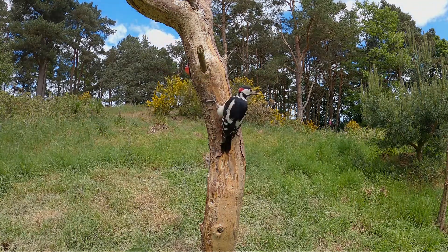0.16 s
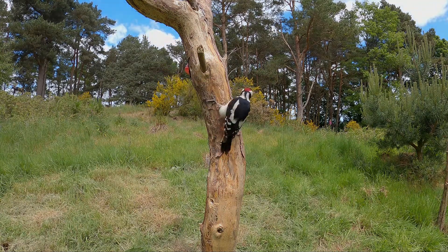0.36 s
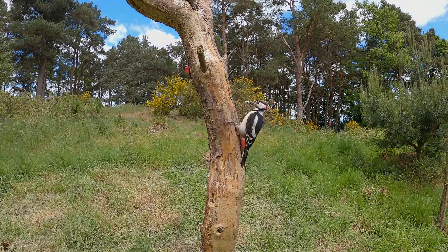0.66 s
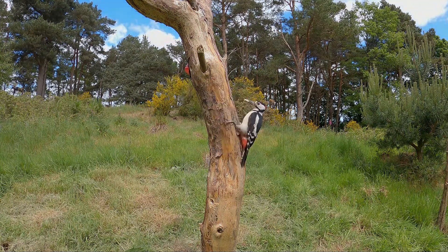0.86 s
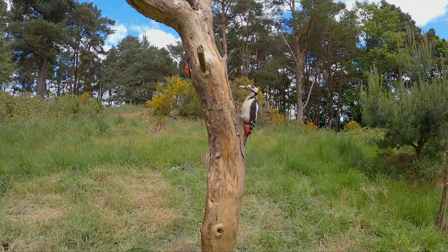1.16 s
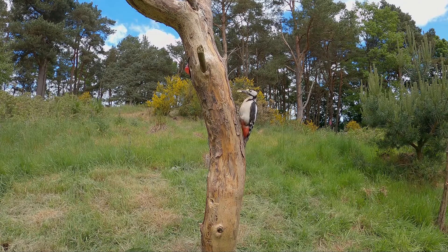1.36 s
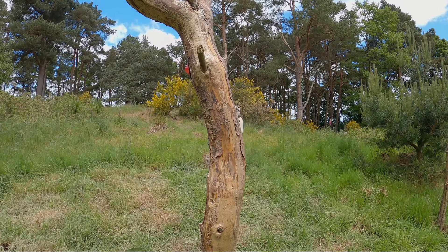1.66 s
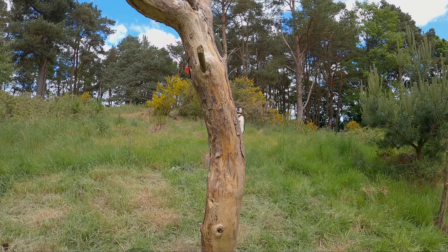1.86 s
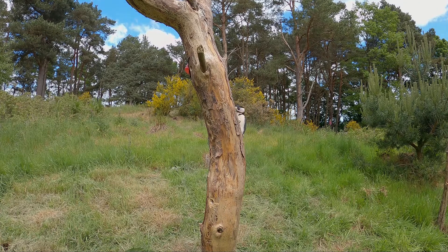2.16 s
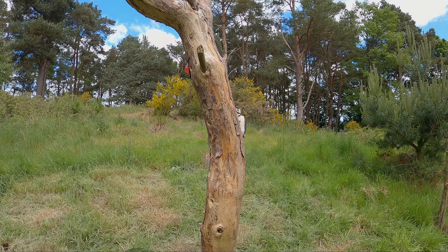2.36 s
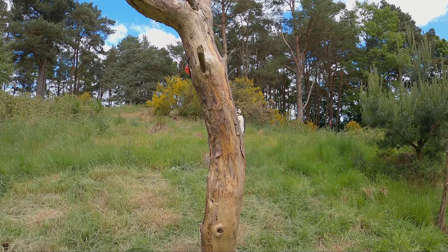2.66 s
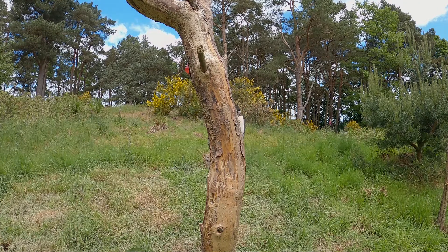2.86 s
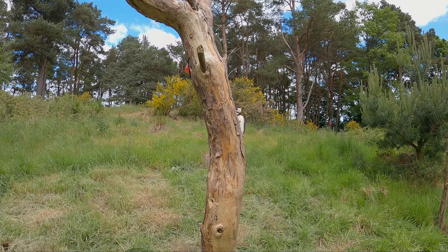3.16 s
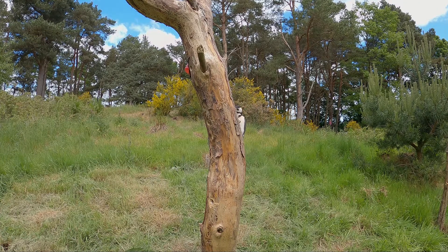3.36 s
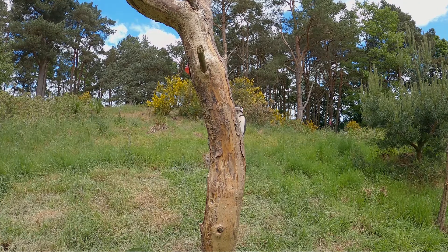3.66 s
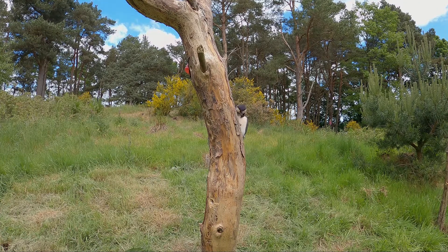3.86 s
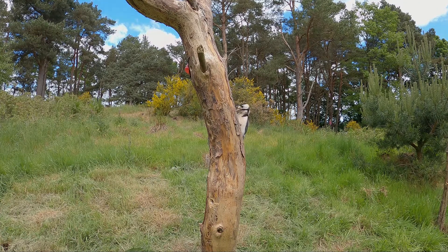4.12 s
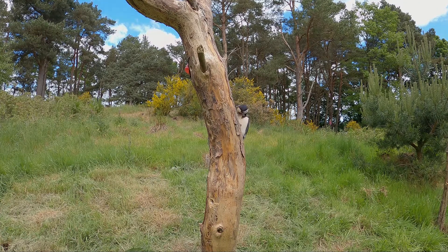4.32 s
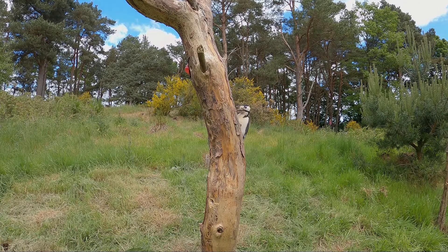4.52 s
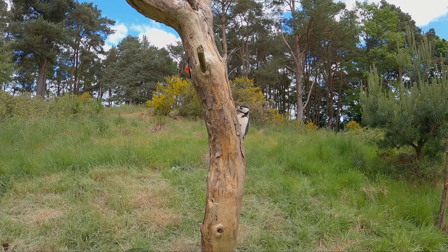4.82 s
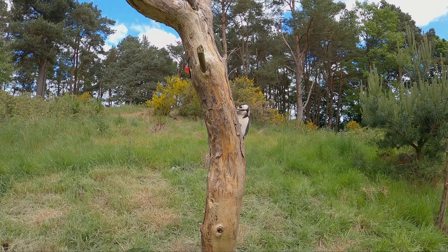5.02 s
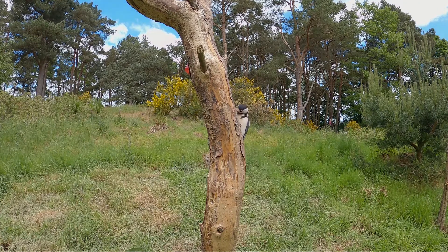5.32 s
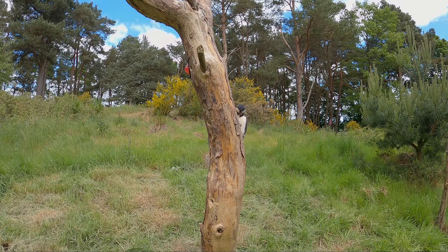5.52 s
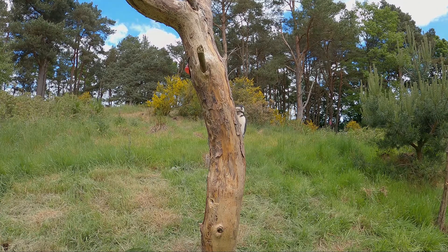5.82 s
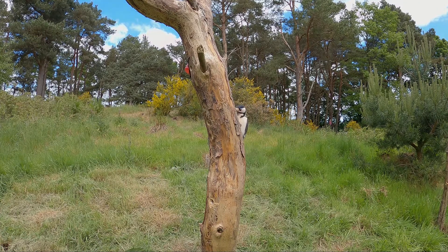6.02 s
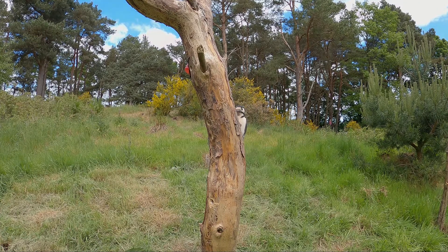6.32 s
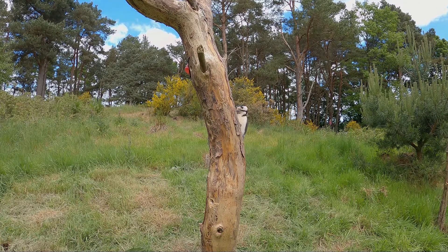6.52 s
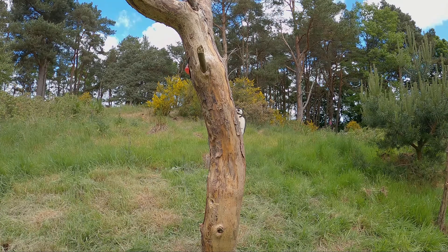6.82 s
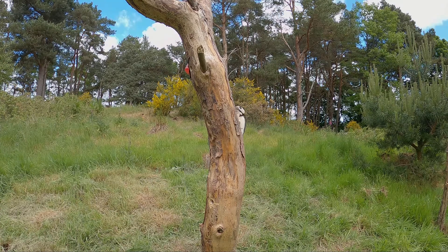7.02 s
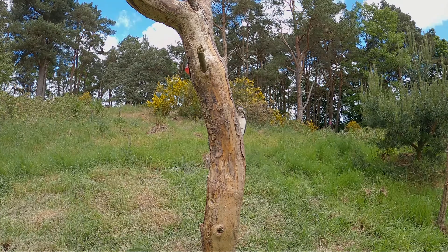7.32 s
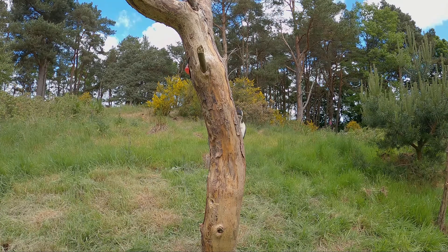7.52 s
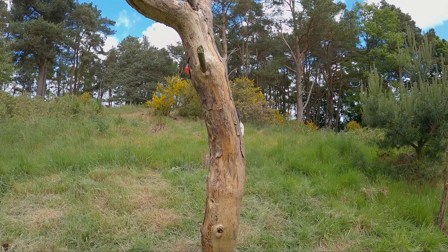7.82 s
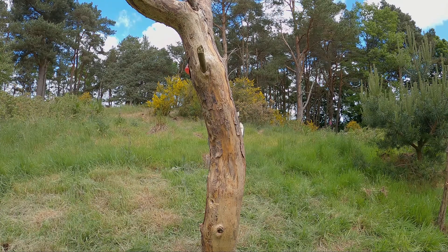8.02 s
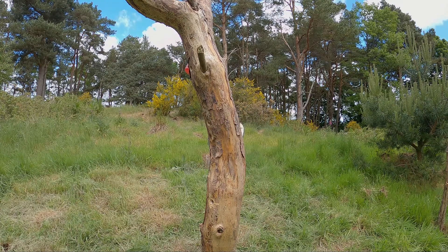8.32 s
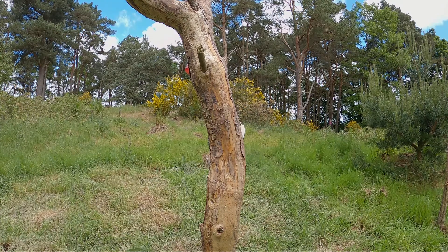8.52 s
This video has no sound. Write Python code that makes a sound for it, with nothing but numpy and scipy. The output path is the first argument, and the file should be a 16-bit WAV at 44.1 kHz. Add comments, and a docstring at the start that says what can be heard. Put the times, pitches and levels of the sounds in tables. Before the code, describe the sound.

Quiet open woodland in stereo, with soft air, faint leaves and far birds. Claws scrape a dry trunk in short crisp scratches, then a bill knocks it at uneven intervals, each a dry crack with a hollow thump. Whistles and chirps echo lightly among the trees. Midway, low lumpy wind buffets the left of the microphone, then fades, leaving birds, one clear late tap and small claw scratches.

```python
"""In a wood, a woodpecker hitches round a dead trunk, claws scratching, and taps it with its bill.
Songbirds call behind: gliding near-sine notes, some blurred by scattered paths, plus a faint far chorus.
Distant air and leaves are coloured noise; a gust is lumpy low noise, strongest on the left port.
Claws are ringing grains, noise snaps and plucked splinters; the bill is a noise crack that rings the wood.
Decaying noise echoes the birds and trunk, and the microphone adds a faint hiss."""
import sys
import numpy as np
from scipy import signal
from scipy.fft import rfft, irfft, next_fast_len
from scipy.io import wavfile

SR = 44100
rng = np.random.default_rng(int(sys.argv[2]) if len(sys.argv) > 2 else 0)


def transcribe(signal):
    """Save signal, clipped to [-1, 1], as a 16-bit WAV file at the path in sys.argv[1]."""
    frames = np.atleast_2d(signal).T
    limited = np.clip(frames, -1, 1)
    pcm = np.round(limited * 32767).astype(np.int16)
    wavfile.write(sys.argv[1], SR, pcm)


N = 382788
T = np.arange(N) / SR
SIZE = next_fast_len(N + SR)  # FFT length, with a second to spare


def amp(db):
    """Turn decibels into a plain multiplier."""
    return 10 ** (np.asarray(db) / 20)


def rms_one(x):
    """Scale to an RMS (average strength) of one."""
    return x / np.sqrt(np.mean(x ** 2) + 1e-20)


def at_hz(points):
    """Read a (frequency [Hz], value) table at every FFT bin, on a log-frequency axis."""
    hz, value = np.transpose(points)
    bin_hz = np.arange(SIZE // 2 + 1) * SR / SIZE
    return np.interp(np.log(bin_hz + 1), np.log(hz + 1), value)


def colour(x, spectrum):
    """Filter to a spectrum, minimum phase so nothing sounds early; white noise keeps its power."""
    gain = rms_one(amp(at_hz(spectrum)))
    cepstrum = irfft(np.log(gain), SIZE)
    # folding the cepstrum forward in time gives the minimum-phase filter
    cepstrum[1:SIZE // 2] *= 2
    cepstrum[SIZE // 2 + 1:] = 0
    response = np.exp(rfft(cepstrum))
    return irfft(rfft(x, SIZE) * response, SIZE)[..., :N]


def lowpass(x, order, hz):
    """Keep what lies below a frequency."""
    return signal.sosfilt(signal.butter(order, hz, fs=SR, output="sos"), x)


def highpass(x, order, hz):
    """Keep what lies above a frequency."""
    return signal.sosfilt(signal.butter(order, hz, "high", fs=SR, output="sos"), x)


def drift(rate_hz):
    """Slow random wandering: noise twice through a one-pole low-pass, with a spread of one."""
    r = np.exp(-2 * np.pi * rate_hz / SR)
    noise = rng.standard_normal(N + SR)
    settled = signal.lfilter([1], [1, -2 * r, r * r], noise)[SR:]
    return rms_one(settled)


def near_noise(unlike=0.28):
    """White noise from close by, mostly the same on both sides."""
    mid, side = rng.standard_normal((2, N))
    return (mid + unlike * side * [[1], [-1]]) / np.hypot(1, unlike)


def bursts(times, levels_db, t60, rise_s):
    """Noise that jumps up at each time and falls 60 dB in t60 seconds."""
    envelope = np.zeros(N)
    t = np.arange(int(t60 * SR)) / SR
    for s, db in zip(times, levels_db):
        part = envelope[int(s * SR):int(s * SR) + len(t)]
        shape = amp(db - 60 * t / t60) * (1 - np.exp(-t / rise_s))
        part += shape[:len(part)]
    return envelope * near_noise()


def strike(times, levels_db, modes, spread_db, contact_hz, lean_db=0):
    """Each blow rings every mode with a strength of its own; a long contact softens the click."""
    out = np.zeros(N)
    luck = rng.standard_normal((len(times), len(modes)))
    for k, (hz, db, t60) in enumerate(modes):
        # a lean raises modes above 3850 Hz and lowers those below by the same amount
        lean = lean_db * np.sign(hz - 3850)
        clicks = np.full(N, 1e-18)
        clicks[(times * SR).astype(int)] = amp(levels_db + db + spread_db * luck[:, k] + lean)
        r, w = amp(-60 / (t60 * SR)), 2 * np.pi * hz / SR
        out += signal.lfilter([0, np.sin(w)], [1, -2 * r * np.cos(w), r * r], clicks)
    return lowpass(out, 4, contact_hz)


def pings(times, levels_db, pitches_hz, cycles):
    """One sine for each event, at a pitch of its own, falling 60 dB over the given cycles."""
    out = np.zeros(N)
    for s, db, hz in zip(times, levels_db, pitches_hz):
        t = np.arange(int(cycles / hz * SR)) / SR
        ping = amp(db - 60 * t * hz / cycles) * np.sin(2 * np.pi * hz * t)
        out[int(s * SR):int(s * SR) + len(t)] += ping
    return out


# background before its waver and left-right mix:
# (time [s], distant air level [dB], leaves level [dB])
AIR_LEVELS = [(0, -65.5, -70), (1, -64, -68.5), (2.7, -62, -67), (4, -61.5, -67.5), (5.401, -64.5, -68.5),
              (6.76, -64, -69), (6.8, -63, -76), (8.68, -64.5, -76)]
# tone of the distant air: (frequency [Hz], relative level [dB per Hz])
DISTANT_TONE = [(20, -24.5), (35, -7), (60, -14.5), (112, -19.5), (140, -5.5), (168, -1.5), (300, -5),
                (500, -1), (620, -12), (820, -17), (1050, -7.5), (1480, -10), (1620, -19), (2500, -61.5)]
# tone of the leaves: (frequency [Hz], relative level [dB per Hz])
LEAVES_TONE = [(940, -28.5), (1600, -5.5), (2740, -3), (3830, -2), (4460, -6.5), (5610, -8), (6610, -14.5),
               (15800, -44)]
# how alike the background is left and right: (frequency [Hz], likeness [1 = the same])
AIR_LIKENESS = [(60, 1), (200, 0.47), (480, 0.94), (1100, 0.58), (3400, 0.27), (4300, 0.1), (12000, 0.11)]


def air():
    """Far rush and nearer leaves: two coloured noises that waver, partly alike in both ears."""
    s, distant_db, leaves_db = np.transpose(AIR_LEVELS)
    white = rng.standard_normal((2, 2, N))
    distant_gain = amp(np.interp(T, s, distant_db) + 0.7 * drift(1.0))  # waver spread 0.7 dB
    leaves_gain = amp(np.interp(T, s, leaves_db) + 0.5 * drift(13.0))  # waver spread 0.5 dB
    both = distant_gain * colour(white[0], DISTANT_TONE)
    both += leaves_gain * colour(white[1], LEAVES_TONE)
    mid, side = rfft(both, SIZE)
    alike = np.clip(at_hz(AIR_LIKENESS), -1, 1)
    stereo = np.sqrt(1 + alike) * mid + np.sqrt(1 - alike) * side * [[1], [-1]]
    return irfft(stereo, SIZE)[:, :N]


def chorus(count):
    """Far birds too faint to tell apart: short falling whistles that sink and swell with the leaves."""
    out = np.zeros((2, N))
    for when, pitch, length, loud, side in rng.random((count, 5)):
        t = np.arange(int((0.03 + 0.11 * length) * SR)) / SR
        start = int(when * (N - len(t)))
        hz = (2900 + 1400 * pitch) * (1 + 0.0803 * np.exp(-t / 0.015))
        note = np.sin(np.pi * t / t[-1]) * np.sin(2 * np.pi * np.cumsum(hz) / SR)
        level = amp(-75 + 6.2 * loud)
        out[:, start:start + len(t)] += level * note * [[side], [1 - side]]
    s, _, leaves_db = np.transpose(AIR_LEVELS)
    return out * amp(np.interp(T, s, leaves_db - leaves_db.max()))


def sing(notes, scatter, rise_s, glide_s_per_khz, bend_s, fade_db_per_s, softer_db_per_khz):
    """Near sines glide on to a pitch, fade and bend away; scattered paths beat and widen the line."""
    out = np.zeros((2, N))
    for s, length, from_hz, held_hz, end_hz, db, blur in notes:
        span = slice(int(s * SR), int((s + length) * SR))
        t = T[span] - s
        # a wider glide takes longer
        glide_s = glide_s_per_khz * (abs(from_hz - held_hz) + 1) / 1000
        glide_hz = (from_hz - held_hz) * np.exp(-t / glide_s)
        bend_hz = (end_hz - held_hz) * np.exp((t - length) / bend_s)
        hz = held_hz + glide_hz + bend_hz
        edges = np.clip(np.minimum(t / rise_s, (length - t) / 0.002), 0, 1)  # ends over 2 ms
        # softer while still far from the held pitch
        level = amp(db - fade_db_per_s * t - softer_db_per_khz * abs(glide_hz) / 1000)
        tone = np.sqrt(2) * np.exp(2j * np.pi * np.cumsum(hz) / SR)
        paths = np.sqrt(1 - blur ** 2) + blur * scatter[:, span]
        out[:, span] += edges * level * (tone * paths).real
    return out


# whistles, near and far, level, sagging or slightly rising; level is before the fade:
# (time [s], length [s], start pitch [Hz], end pitch [Hz], level [dB])
WHISTLE_NOTES = [(0.119, 0.1, 2920, 2720, -71.5), (0.982, 0.4, 3470, 3400, -78.5),
                 (1.5, 0.19, 2885, 2670, -68.5), (1.928, 0.06, 3320, 3280, -68),
                 (1.983, 0.26, 3122, 3180, -62.5), (2.41, 0.098, 3480, 3470, -67),
                 (2.433, 0.12, 3080, 2880, -69), (3.991, 0.034, 3510, 3610, -65.5),
                 (4.353, 0.077, 6010, 5810, -69.5), (4.425, 0.12, 6400, 6220, -72.5),
                 (4.565, 0.052, 5800, 5950, -67), (5.549, 0.11, 2830, 2700, -72),
                 (5.665, 0.084, 3424, 3396, -61.5), (6.331, 0.13, 3434, 3550, -66),
                 (6.349, 0.092, 3200, 3040, -66), (6.542, 0.058, 3360, 3380, -49),
                 (6.613, 0.04, 3350, 3270, -66), (6.689, 0.071, 3340, 3392, -64),
                 (6.806, 0.029, 3990, 2920, -70.5), (6.945, 0.05, 3030, 2980, -80),
                 (7.962, 0.049, 5700, 5600, -77.5), (8.001, 0.06, 3780, 3390, -78),
                 (8.113, 0.1, 3090, 2970, -80), (8.41, .115, 3040, 2824, -71)]
# a songbird, nearer and farther; level is before glide and fade, blur is the scattered share:
# (time [s], length [s], from pitch [Hz], held pitch [Hz], end pitch [Hz], level [dB], blur [0-1])
HOOKED_NOTES = [(.165, 0.028, 6500, 5800, 5500, -71, .3), (3.92, 0.032, 6470, 6350, 6010, -67, 0.6),
                (4.152, 0.07, 7700, 6400, 7100, -66, 0.7), (4.2, 0.06, 6430, 5900, 5640, -63, 0.35),
                (5.8, 0.036, 8620, 7830, 7820, -60, 0.5), (6.083, 0.025, 9000, 8020, 8180, -60.5, 0.1),
                (6.237, 0.087, 5140, 4470, 3680, -51.5, 0.23),
                (6.519, 0.016, 4254, 3400, 3345, -44.5, 0.15), (6.785, 0.21, 4900, 4850, 4800, -71, 1),
                (7.103, 0.15, 5790, 4025, 3780, -63.5, 0.85), (7.468, 0.065, 6400, 3610, 3730, -64, 0.8),
                (7.805, 0.042, 6650, 5700, 5570, -69.5, 0.3), (7.836, 0.043, 7000, 3500, 3350, -70, 0.4),
                (8.18, 0.29, 6410, 4050, 3980, -69.5, 1), (8.558, 0.17, 4340, 3640, 3500, -66.5, 1)]
# quick strokes of birds, mostly scooping up from below, a few falling, the last few fainter;
# level is before glide and fade:
# (time [s], length [s], from pitch [Hz], held pitch [Hz], end pitch [Hz], level [dB])
QUICK_NOTES = [(5.103, 0.025, 2880, 3220, 3160, -62), (5.125, 0.029, 3460, 3610, 2600, -54),
               (5.217, 0.023, 2680, 3140, 3810, -46), (5.238, 0.026, 2910, 3200, 3100, -56),
               (5.294, 0.023, 2820, 3130, 3610, -52), (5.315, .016, 2460, 2575, 2610, -59),
               (5.364, 0.041, 2360, 3620, 2950, -40.5), (5.385, 0.03, 3870, 4070, 4540, -53.5),
               (5.452, 0.062, 2990, 3276, 3190, -53.5), (5.467, 0.023, 3830, 4030, 3900, -57),
               (5.522, 0.047, 2610, 3566, 3420, -43), (5.535, 0.012, 3680, 3930, 3870, -47.5),
               (6.849, 0.01, 3100, 3750, 3880, -65), (6.957, .014, 3500, 4000, 4150, -67),
               (6.99, 0.0091, 3600, 3900, 4080, -72), (7.289, 0.037, 3880, 3150, 2700, -68)]


def songbirds():
    """Three kinds of note, each with its own way to rise, glide, bend and fade."""
    scatter = np.array([drift(100) + 1j * drift(100) for _ in range(2)]) / np.sqrt(2)
    whistles = [(s, length, start_hz, start_hz, end_hz, db, 0.3)  # 0.3 is the blur
                for s, length, start_hz, end_hz, db in WHISTLE_NOTES]
    quick_strokes = [(*row, 0.55) for row in QUICK_NOTES]  # 0.55 is the blur
    birds = sing(whistles, scatter, rise_s=0.0021, glide_s_per_khz=0.01, bend_s=0.056,
                 fade_db_per_s=24, softer_db_per_khz=3)
    birds += sing(HOOKED_NOTES, scatter, rise_s=0.0011, glide_s_per_khz=0.0035, bend_s=0.012,
                  fade_db_per_s=48, softer_db_per_khz=2.8)
    birds += sing(quick_strokes, scatter, rise_s=0.0019, glide_s_per_khz=0.00528, bend_s=0.01105,
                  fade_db_per_s=250, softer_db_per_khz=16)
    return birds


def skid_grains():
    """Dense uneven slips, each ringing briefly at one of 16 pitches."""
    slips = (rng.random(N) < 18000 / SR) * amp(1.5 * np.minimum(rng.exponential(1, N), 4))
    slips = slips * near_noise() + 1e-18
    dealt = rng.integers(0, 16, N)  # which pitch each slip gets
    grains = 0
    for k, hz in enumerate(np.geomspace(1500, 14000, 16)):
        r = amp(-60 * hz / (28 * SR))  # a grain falls 60 dB in 28 cycles
        poles = [1, -2 * r * np.cos(2 * np.pi * hz / SR), r * r]
        ringing = signal.lfilter([1, 0, -1], poles, slips * (dealt == k))
        grains += np.sqrt(hz) * rms_one(ringing)
    return rms_one(grains)


# claws dragging; level is before tone shaping, the lift raises treble and lowers the rest:
# (start time [s], swell [s], ease [s], level [dB], treble lift [dB])
CLAW_DRAGS = [(0.496, 0.017, 0.047, -67.5, 8.5), (0.576, 0.0074, 0.033, -55.5, 8),
              (0.617, 0.004, 0.03, -60.5, -8), (1.095, 0.078, .035, -64, 7.5),
              (1.241, 0.023, 0.046, -59, -1), (1.617, 0.022, 0.034, -57.5, 0.5),
              (1.667, 0.018, 0.014, -52, -2.5), (1.718, 0.011, 0.024, -62.5, -4),
              (3.924, 0.047, 0.017, -65, -4), (7.514, 0.035, 0.037, -64, -4),
              (8.597, 0.047, 0.017, -71, -6)]
# claws catching; level is before tone shaping:
# (time [s], level [dB], pitch of the plucked splinter [Hz])
CLAW_CATCHES = [(0.5101, -54, 7100), (0.5771, -38, 9000), (0.5807, -39.5, 9040), (0.591, -41.5, 3370),
                (0.593, -52, 8800), (0.6014, -37, 2260), (0.62, -45, 1344), (1.2452, -54.5, 4150),
                (1.621, -45.5, 4700), (1.627, -52, 4570), (1.6463, -46, 6330), (1.6697, -34.5, 8300),
                (1.682, -46, 4830), (3.942, -51, 4800), (7.5485, -42, 3630), (7.556, -54, 3870)]
# tone of the claws: (frequency [Hz], relative level [dB per Hz])
CLAW_TONE = [(900, -16.5), (1800, -8), (2600, -10), (3500, 0.5), (4600, 1), (5800, -2.5), (7000, -3),
             (9000, -4), (10500, -13.5), (15500, -30.5)]


def claws():
    """Claws skid in ringing grains and snap where they catch, plucking a splinter of wood."""
    effort, lift = np.zeros(N), np.ones(N)
    for start, swell, ease, db, lift_db in CLAW_DRAGS:
        top, end = start + swell, start + swell + ease
        # pressure at start, top and end, as a share of the strongest
        pressure = np.interp(T, [start, top, end], [0.22, 1, 0.37])
        effort += amp(db) * pressure * (T > start) * (T < end)
        lift[(T > start - 0.005) & (T < end)] = amp(lift_db)
    skid = effort * amp(1.6 * drift(150)) * skid_grains()
    s, db, splinter_hz = np.transpose(CLAW_CATCHES)
    contact = skid + bursts(s, db, t60=0.009, rise_s=0.0001)
    treble = highpass(contact * lift, 2, 5500)
    body = lowpass(contact / lift, 2, 5500)
    splinters = pings(s, db - 8, splinter_hz, cycles=137)  # 8 dB below the snap
    # subtracting lets the two halves join smoothly where they cross
    return colour(body - treble + splinters, CLAW_TONE)


# bill on wood; crack level is before tone shaping, knock and thump before each mode's own strength:
# (time [s], crack level [dB], knock above crack [dB], trunk thump above crack [dB],
#  pitch of the struck spot [Hz], lean to the upper modes [dB])
BILL_TAPS = [(2.4511, -43, -19, -7.5, 1460, 2), (2.7281, -40.5, -9, -9.5, 1055, 3),
             (2.8619, -39.5, -9.5, -11, 1240, -2.5), (3.0039, -41, -8.5, -5.5, 1480, 6.5),
             (3.138, -43, -10, -5, 1090, -0.5), (4.288, -50, -13, -17, 1200, 0),
             (4.4238, -49, -9, -5.5, 1420, 2), (5.2453, -45, -22, -27, 1420, 0),
             (6.085, -53.5, -11, -2.5, 1200, 2), (6.137, -52, -16, -7.5, 1200, 6),
             (6.722, -39, -14.5, -17.5, 1080, -5.5)]
# tone of the crack: (frequency [Hz], relative level [dB per Hz])
CRACK_TONE = [(1470, -35), (2500, -8), (3480, -2.5), (6340, -10), (8580, -12.5), (13000, -54)]
# dead trunk near the blow: (frequency [Hz], relative level [dB], time to fall 60 dB [s])
TRUNK_KNOCK_MODES = [(1844, 1, 0.034), (2270, -4.5, 0.033), (2950, -10, 0.022), (3500, 5, 0.037),
                     (4165, 4, 0.034), (5300, -9, 0.037)]
# dead trunk bending as a whole: (frequency [Hz], relative level [dB], time to fall 60 dB [s])
TRUNK_THUMP_MODES = [(155.4, 0, 0.5), (185.2, -8, 0.43), (236, 4, 0.037), (329, -4.5, 0.096)]


def bill():
    """Fibres crush under the bill, the wood knocks, the whole trunk thumps a moment later."""
    s, crack_db, knock_db, thump_db, spot_hz, lean_db = np.transpose(BILL_TAPS)
    crack = colour(bursts(s, crack_db, t60=0.024, rise_s=0.0002), CRACK_TONE)
    knock = strike(s, crack_db + knock_db, TRUNK_KNOCK_MODES, spread_db=2.0, contact_hz=8000,
                   lean_db=lean_db)
    # the wood right under the bill
    spot = pings(s, crack_db + knock_db + 6, spot_hz, cycles=36)
    thump = strike(s + 0.0022, crack_db + thump_db, TRUNK_THUMP_MODES, spread_db=3.5, contact_hz=610)
    # the slim trunk gives out little sound below its lowest mode
    return crack + knock + spot + highpass(thump, 4, 125)


# wind before its lumps and left-right split: (time [s], level [dB])
GUST_LEVEL = [(0, -85), (1.9, -98), (2.25, -76), (2.6, -84), (4.5, -81), (4.68, -53.5), (4.79, -33.5),
              (4.85, -49.5), (4.97, -43.5), (5.33, -38.5), (5.68, -37), (5.77, -57.5), (6.3, -60.5),
              (6.5, -54.5), (6.8, -68.5), (7.45, -66.5), (8.55, -74), (8.68, -56)]
# which side the gust leans to: (time [s], left minus right level [dB])
GUST_LEAN = [(4.5, 2.5), (4.7, 13), (5.7, 14.5), (6.1, 0.5)]
# tone of the wind: (frequency [Hz], relative level [dB per Hz])
WIND_TONE = [(8.8, -37), (15, 0), (32, 0), (49, -1.5), (130, -18), (170, -48.5), (290, -120)]
# sharp pressure flips on the left port, before each mode's own strength: (time [s], level [dB])
PORT_BUFFETS = [(4.937, -52.5), (5.061, -38), (5.126, -52.5), (5.213, -40.5), (5.338, -40), (5.386, -46.5),
                (5.529, -38), (5.592, -43), (5.637, -39.5)]
# the port cavity: (frequency [Hz], relative level [dB], time to fall 60 dB [s])
PORT_CAVITY_MODES = [(59, 18.5, 0.066), (127, 16.5, 0.02)]


def wind():
    """Lumpy low noise, its own on each port; sharp flips ring the left port's cavity in the gust."""
    level_db = np.interp(T, *np.transpose(GUST_LEVEL))
    lean_db = np.interp(T, *np.transpose(GUST_LEAN))
    share = np.array([amp(lean_db / 2), amp(-lean_db / 2)])
    share *= 2 / np.hypot(*share)
    lumps = amp(9.6 * np.tanh([drift(16.3), drift(14)]))
    rumble = colour(lumps * rng.standard_normal((2, N)), WIND_TONE)
    out = amp(level_db) * share * rumble
    s, db = np.transpose(PORT_BUFFETS)
    out[0] += strike(s, db, PORT_CAVITY_MODES, spread_db=3.5, contact_hz=205)
    return out


def woods(x):
    """Scatter off trunks and leaves: a dying noise tail, its own in each ear."""
    t = np.arange(int(0.8 * SR)) / SR
    fade = amp(-60 * t / 0.43) * (1 - np.exp(-t / 0.0027))  # falls 60 dB in 0.43 s
    tail = rng.standard_normal((2, len(t))) * fade
    tail /= np.sqrt(np.sum(tail ** 2) / 2)
    return signal.fftconvolve(x, tail, axes=1)[:, :N]


# level difference of the two ports: (frequency [Hz], left minus right level [dB])
PORT_LEVELS = [(100, 1.5), (500, -2), (1100, -0.5), (3400, 2.5), (5500, 0.1), (9000, -0.5), (13000, 1.5)]
# phase difference of the two ports: (frequency [Hz], how far left leads [radians])
PORT_LEAD = [(60, -0.7), (480, -0.96), (1100, -1.12), (2000, 1), (3400, -1.12), (4300, -1.58),
             (7000, -1.58), (9000, -1.14)]


def ports(x):
    """The two ports in the housing differ in level and phase, by frequency."""
    half = amp(at_hz(PORT_LEVELS) / 2) * np.exp(0.5j * at_hz(PORT_LEAD))
    return irfft(rfft(x, SIZE) * np.array([half, 1 / half]), SIZE)[:, :N]


def scene():
    """Mix the wood, its birds and the trunk with their echoes; the wind strikes the ports directly."""
    background, birds = air(), songbirds()
    trunk = claws() + bill()
    # levels sent into the echo, in dB: birds -1, trunk -18.5
    echoes = woods(amp(-1) * birds + chorus(count=110) + amp(-18.5) * trunk)
    return ports(background + birds + trunk + echoes) + wind()


def record(dry):
    """The microphone adds a faint hiss; a steep low-pass removes the top."""
    hiss = amp(-96.5) * rng.standard_normal(dry.shape)
    # 60 dB down from 16150 Hz upward
    top_cut = signal.cheby2(20, 60, 16150, fs=SR, output="sos")
    return signal.sosfilt(top_cut, dry + hiss)


dry = scene()
out = record(dry)
transcribe(out)
```